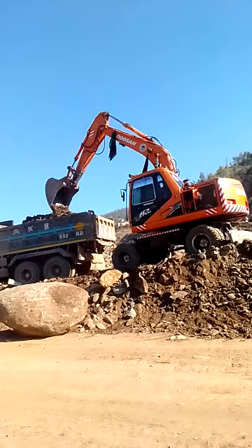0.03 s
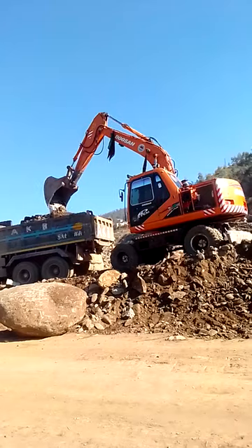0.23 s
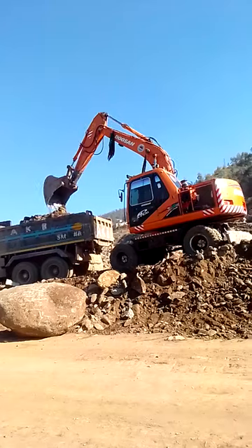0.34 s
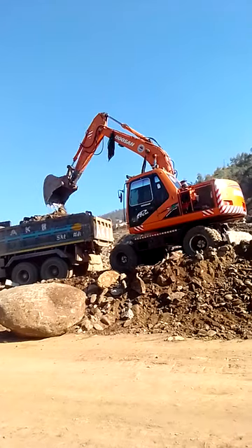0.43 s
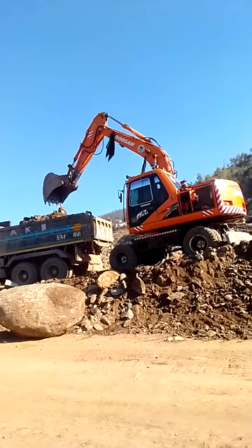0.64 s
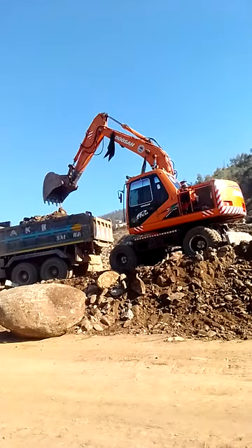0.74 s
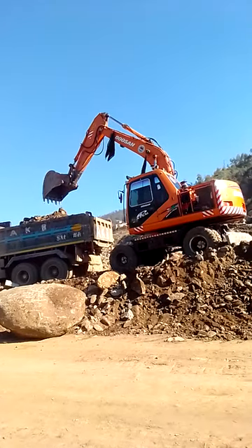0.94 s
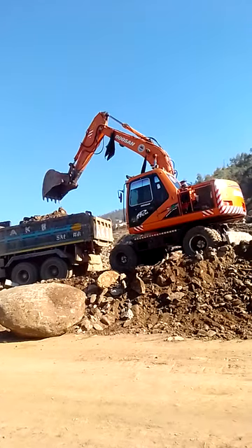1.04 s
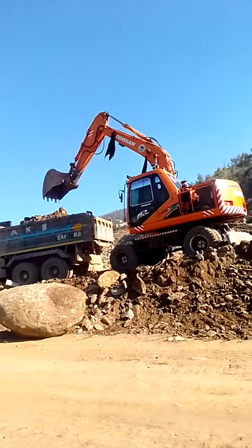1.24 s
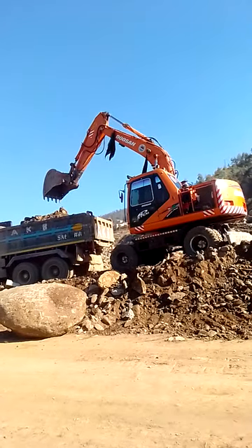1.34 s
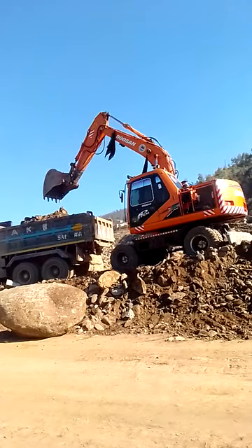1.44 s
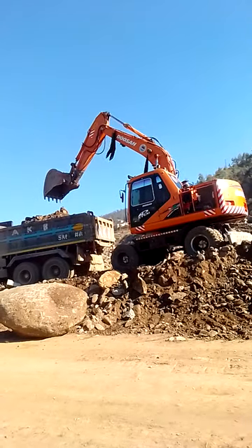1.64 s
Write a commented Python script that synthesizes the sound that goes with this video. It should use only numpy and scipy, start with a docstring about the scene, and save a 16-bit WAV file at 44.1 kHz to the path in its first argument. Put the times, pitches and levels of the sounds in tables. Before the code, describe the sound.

Rocks and soil crash into a metal dump truck bed, thinning out over a faint diesel drone

```python
"""Outdoors, some way off, an excavator tips earth and rubble into the steel bed of a dump truck.
Stones are filtered bursts of tiny impacts, with ringing side walls, clinking rocks and sprays of grit.
Lumps ring the bed floor in decaying sines over a thinning slide of soil, made of random grains.
A horn gives one short toot of summed harmonics; a diesel engine drones underneath as tones and noise."""
import sys
import numpy as np
from scipy import signal
from scipy.fft import rfft, irfft
from scipy.io import wavfile

SR = 44100
rng = np.random.default_rng(int(sys.argv[2]) if len(sys.argv) > 2 else 0)


def put_to_file(sound):
    """Save the sound as 16-bit audio at rate SR, in the file named by the first command-line argument."""
    columns = np.atleast_2d(sound).T  # one column per channel
    safe = np.clip(columns, -1, 1)
    whole_steps = np.round(safe * 32767)
    wavfile.write(sys.argv[1], SR, whole_steps.astype(np.int16))


N = 74970
T = np.arange(N) / SR
START_S = 0.2145


def amp(db):
    """Decibels to gain."""
    return 10 ** (np.asarray(db) / 20)


def evened(x):
    """Scales to rms 1."""
    return x / np.sqrt(np.mean(x ** 2) + 1e-20)


def decay(t, t60_s):
    """Exponential fall of 60 dB in t60_s."""
    return np.exp(-np.log(1000) * t / t60_s)


def onset(t, rise_s):
    """Exponential approach to 1 with time constant rise_s."""
    return 1 - np.exp(-t / rise_s)


def add(mix, start_s, sound):
    """Adds a sound into the mix at a time, cut at the end of the mix."""
    part = mix[max(round(start_s * SR), 0):][:len(sound)]
    part += sound[:len(part)]


def curve(rows, column=1):
    """Gain over time from one dB column of a table, interpolated in dB."""
    rows = np.array(rows)
    return amp(np.interp(T, rows[:, 0], rows[:, column]))


def taps(points, size=4096):
    """Minimum-phase filter with the spectrum given as (Hz, dB) points."""
    hz, db = np.transpose(points)
    grid_hz = abs(np.fft.fftfreq(size, 1 / SR)) + 1
    log_gain = np.log(amp(np.interp(np.log(grid_hz), np.log(hz), db)))
    # the Hilbert transform of the log gain gives the phase that makes the filter causal
    spectrum = np.exp(np.conj(signal.hilbert(log_gain)))
    return np.fft.ifft(spectrum).real[:size // 2]


def colour(x, response):
    """Passes a sound through a filter."""
    return signal.fftconvolve(x, response)[:len(x)]


def band(x, low_hz, high_hz):
    """Band-pass."""
    edges_hz = [low_hz, min(high_hz, SR / 2 - 1)]
    return signal.sosfilt(signal.butter(3, edges_hz, "band", fs=SR, output="sos"), x)


def drift(rate_hz):
    """Slow random wander of rms 1: noise under a Gaussian low-pass of width rate_hz."""
    lowpass = np.exp(-(np.fft.rfftfreq(N, 1 / SR) / rate_hz) ** 2)
    return evened(irfft(rfft(rng.standard_normal(N)) * lowpass, N))


def grains(per_s, spread_db, size=N):
    """Random tiny impacts of either sign, a few of them large, at rms 1."""
    hit = rng.random(size) < per_s / SR
    strength = np.minimum(rng.exponential(1, size), np.pi)
    sign = rng.choice([-1., 1.], size)
    return evened(hit * amp(spread_db * strength) * sign)


# Stones striking the load and the bed.
# Each row: start in seconds, then relative levels in dB of thud, clang, knock and crack.
STONE_HITS = [(.216, -61, -34, -40.5, -28.5), (.221, -43, -30.5, -35, -32), (.235, -44, -28.5, -35.5, -50),
              (.273, -53, -35, -33.5, -44), (.293, -32.5, -29, -31.5, -24.5), (.316, -46, -43, -50, -32.5),
              (.335, -36, -39, -37.5, -38), (.349, -39, -30, -30.5, -23.5),
              (.389, -34, -25.5, -31.5, -34.5), (.399, -31.5, -26.5, -44, -43),
              (.421, -43, -59, -37.5, -35), (.451, -48, -54, -38.5, -37.5), (.530, -37.5, -35, -59, -60),
              (.574, -43.5, -29.5, -38.5, -38.5), (.586, -49, -38, -54, -41), (.617, -55, -41, -63, -44),
              (.636, -46, -33, -66, -57), (.681, -34, -33.5, -44, -45), (.711, -41, -24.5, -29.5, -27),
              (.724, -34.5, -22, -31, -30), (.742, -37, -26.5, -37.5, -34.5), (.785, -50, -43, -41, -30),
              (.857, -38, -33.5, -44, -55), (.898, -42.5, -30, -41, -63), (.982, -47, -35, -75, -50.5),
              (.993, -40, -44, -67, -73), (1.050, -55, -42, -54, -40.5), (1.123, -43.5, -45, -65, -60),
              (1.211, -47, -41, -43.5, -41.5), (1.226, -41.5, -37.5, -49, -44),
              (1.241, -38, -30, -47.5, -43), (1.285, -39, -43, -65, -63), (1.613, -44, -41, -46, -50),
              (1.622, -40, -43, -44, -47.5), (1.638, -42, -38.5, -57, -50)]
# The four registers of a blow, thud to crack. Each row: low edge in Hz, high edge in Hz,
# burst t60 in seconds, tail level in dB re burst, tail t60 in seconds.
STONE_REGISTERS = [(168, 523, 0.086, -12.5, 0.68), (523, 1100, 0.058, -13, 0.52),
                   (1220, 3220, 0.11, -16.5, 0.67), (3250, 6250, 0.059, -16, 0.32)]
# Colour of the clatter; stones() shifts it up for early cracks. Each row: frequency in Hz, gain in dB.
CLATTER_COLOUR = [(100, -12.5), (190, -16), (275, 2.5), (370, -6), (450, -5), (540, -14), (670, 1),
                  (870, 4.5), (1070, -11.5), (1330, -4), (1550, -13), (1850, -12), (2300, -20),
                  (2600, -20.5), (3150, -31.5), (3550, -14.5), (4250, -7.5), (4750, -4), (5100, -17),
                  (5500, -17.5), (6250, -41), (9000, -52), (15500, -56)]
STONES_GAIN_DB = 2
STRIKE_RISE_S, TAIL_RISE_S = 0.0011, 0.011
CRUMBLE_PER_S, CRUMBLE_SPREAD_DB = 9000, 2.5
FIRST_LIFT_RATIO, SETTLE_S = 0.071, 0.2


def stones(size=26000):
    """Each stone crunches in a short burst of impacts, and the bed rattles on in a slower tail."""
    out, t = np.zeros(N), np.arange(size) / SR
    plain = taps(CLATTER_COLOUR)
    for start_s, *levels_db in STONE_HITS:
        # the first stones crack at a higher pitch, which sinks as the heap grows
        lift = 1 + FIRST_LIFT_RATIO * np.exp(-(start_s - START_S) / SETTLE_S)
        lifted = taps([(hz * lift, db) for hz, db in CLATTER_COLOUR])
        responses = [plain] * (len(STONE_REGISTERS) - 1) + [lifted]
        for level_db, response, register in zip(levels_db, responses, STONE_REGISTERS):
            low_hz, high_hz, burst_t60_s, tail_db, tail_t60_s = register
            voice = band(response, low_hz, high_hz)
            burst_part = (burst_t60_s, 0, STRIKE_RISE_S)
            tail_part = (tail_t60_s, tail_db, TAIL_RISE_S)
            for t60_s, part_db, rise_s in (burst_part, tail_part):
                shape = onset(t, rise_s) * decay(t, t60_s)
                crunch = grains(CRUMBLE_PER_S, CRUMBLE_SPREAD_DB, size) * shape
                sound = evened(colour(crunch, voice)) * np.sqrt(np.mean(shape ** 2))
                add(out, start_s, sound * amp(level_db + part_db + STONES_GAIN_DB))
    return out


# Modes of the steel side walls.
# Each row: frequency in Hz, bandwidth in Hz, level in dB.
SIDE_WALL_MODES = [(438, 7.1, -3), (1250, 23, -0.5), (1357, 10, 0), (4100, 15, 3.5), (4350, 30, 5.5),
                   (4640, 18, 2.5), (4890, 15, 6)]


def walls(blows):
    """The blows plus the side walls' resonances, which they set ringing."""
    ring = np.zeros(N)
    for hz, width_hz, db in SIDE_WALL_MODES:
        unit_peak = 2 * np.pi * width_hz / SR
        ring += amp(db) * unit_peak * np.exp(-np.pi * width_hz * T) * np.sin(2 * np.pi * hz * T)
    return blows + colour(blows, ring)


# Hard rocks that ring briefly.
# Each row: start in seconds, relative level in dB, centre pitch in Hz, t60 in seconds.
ROCK_CLINKS = [(.2205, -16, 805, 0.032), (0.3162, -20.5, 4274, 0.042), (0.334, -30.5, 5300, 0.03),
               (.422, -31.5, 4750, 0.042), (.451, -29.5, 4630, 0.025), (.461, -30, 4130, 0.034),
               (.617, -36, 4650, 0.036), (.741, -15.5, 813, 0.041), (.789, -24, 4250, 0.055),
               (.898, -22.5, 1235, 0.077), (1.052, -35, 4400, 0.037), (1.24, -38, 4400, 0.044),
               (1.623, -35, 807, 0.081)]
# Partials of a clink. Each row: ratio to the centre pitch, relative level in dB.
CLINK_PARTIALS = [(0.921, -9), (0.999, -1.5), (1.069, -4)]
ROCKS_GAIN_DB, ROCK_RISE_CYCLES = 2.0, 2.15


def rocks():
    """A hard rock clinks with a cluster of close, quickly dying partials."""
    out = np.zeros(N)
    for start_s, db, hz, t60_s in ROCK_CLINKS:
        ring = sum(amp(partial_db) * np.sin(2 * np.pi * (hz * ratio * T + rng.random()))
                   for ratio, partial_db in CLINK_PARTIALS)
        shape = onset(T, ROCK_RISE_CYCLES / hz) * decay(T, t60_s)
        add(out, start_s, amp(db + ROCKS_GAIN_DB) * ring * shape)
    return out


# Chips of grit that snap and scatter.
# Each row: start in seconds, relative level in dB, t60 in seconds.
GRIT_CHIPS = [(0.292, -60, 0.046), (0.336, -55, 0.033), (0.419, -59, 0.088), (0.611, -56.5, 0.1),
              (0.712, -60, 0.17), (1.066, -64, .12), (1.211, -62, .08)]
# Colour of the grit. Each row: frequency in Hz, gain in dB.
GRIT_COLOUR = [(800, -12), (2200, 3), (3200, -11), (5500, 18.5), (7000, 4.5), (9500, -5.5), (15500, -17)]
CHIPS_GAIN_DB, CHIP_GRAINS_PER_S, CHIP_SPREAD_DB = 8.5, 5500, 4.4


def chips():
    """Short bright sprays of grit: filtered impacts under a decay."""
    out, response = np.zeros(N), taps(GRIT_COLOUR)
    for start_s, db, t60_s in GRIT_CHIPS:
        spray = evened(colour(grains(CHIP_GRAINS_PER_S, CHIP_SPREAD_DB), response))
        add(out, start_s, amp(db + CHIPS_GAIN_DB) * spray * decay(T, t60_s))
    return out


# Heavy lumps that set the bed floor ringing.
# Each row: start in seconds, relative level in dB, ratio applied to the floor's pitches.
HEAVY_LUMPS = [(0.394, -44, 1.1), (1.215, -30, 1.004), (1.232, -40, 1.24), (1.368, -45.5, .97)]
# Modes of the bed floor. Each row: frequency in Hz at ratio 1, relative level in dB, t60 in seconds.
BED_FLOOR_MODES = [(145.5, -18, 1), (257.5, 3.5, 0.29), (268.4, 3.5, 0.46), (332, -3, 0.22),
                   (444.6, -11.5, .38), (690, -13.5, .45), (950, -17.5, 0.67)]


def lumps():
    """Heavy lumps boom on the bed floor, each exciting all its modes as decaying sines."""
    out = np.zeros(N)
    for start_s, db, ratio in HEAVY_LUMPS:
        ring = sum(amp(mode_db - 60 * T / t60_s) * np.sin(2 * np.pi * hz * ratio * T)
                   for hz, mode_db, t60_s in BED_FLOOR_MODES)
        add(out, start_s, amp(db) * ring * onset(T, 0.013))
    return out


# The truck's frame jolted by the load.
# Each row: start in seconds, relative level in dB, frequency in Hz.
FRAME_JOLTS = [(.395, -40, 120.4), (.402, -41.5, 89.5), (0.881, -47, 93.2), (1.631, -48.5, 129)]


def jolts():
    """The load jolts the frame, a low sine with a soft onset and a short decay."""
    out = np.zeros(N)
    for start_s, db, hz in FRAME_JOLTS:
        shape = onset(T, 0.0057) * np.exp(-T / 0.033)
        add(out, start_s, amp(db) * np.sin(2 * np.pi * hz * T) * shape)
    return out


# Sliding soil and gravel.
# Each row: time in seconds, then levels in dB of the body, the treble and the sandy fizz.
SLIDE_LEVELS = [(.215, -36, -33, -81), (.3, -36, -35.5, -73), (.42, -33.5, -36, -67),
                (.49, -40, -45.5, -70.5), (.6, -37, -44.5, -65), (.66, -40, -52.5, -71),
                (.75, -41, -41.5, -68.5), (.9, -40.5, -46.5, -71.5), (1.0, -42, -60, -70.5),
                (1.09, -55, -52.5, -71.5), (1.19, -52.5, -59.5, -73), (1.33, -49, -62, -74.5),
                (1.55, -57, -65, -77), (1.7, -50, -74, -76.5)]
SOIL_PER_S, SOIL_SPREAD_DB = 2200, 1.5
GRAVEL_PER_S, GRAVEL_SPREAD_DB = 1300, 1.3
SAND_PER_S, SAND_SPREAD_DB = 8700, 2.4
SAND_FLUTTER_DB, SAND_FLUTTER_HZ = 0.95, 50


def slide():
    """Soil and gravel pour on to the heap as filtered grains, with a faint fluttering fizz of sand."""
    response = taps(CLATTER_COLOUR)
    sand_response = taps([(2000, -26), (6000, 1.5), (8000, 3), (10000, -2.5), (15500, -4.5)])
    body = evened(band(colour(grains(SOIL_PER_S, SOIL_SPREAD_DB), response), 183, 1470))
    gravel = evened(band(colour(grains(GRAVEL_PER_S, GRAVEL_SPREAD_DB), response), 1630, 13500))
    sand = evened(colour(grains(SAND_PER_S, SAND_SPREAD_DB), sand_response))
    flutter = amp(SAND_FLUTTER_DB * drift(SAND_FLUTTER_HZ))
    return (body * curve(SLIDE_LEVELS, 1) + gravel * curve(SLIDE_LEVELS, 2)
            + sand * curve(SLIDE_LEVELS, 3) * flutter)


# Harmonics of the horn.
# Each row: multiple of the pitch, relative level in dB at mid-toot, change over the toot in dB.
HORN_HARMONICS = [(1, -26, -2), (2, 5, -4.5), (3, 2, -2), (4, -9, -14), (5, -9.5, -6), (6, -8.5, 6),
                  (7, -18.5, -17), (9, -14.5, -9), (10, -2.5, 0), (11, -9.5, -5), (12, -9, 4.5)]
HORN_ON_S, HORN_OFF_S, HORN_RISE_S, HORN_T60_S = 0.706, 0.883, 0.0029, 0.28
HORN_HZ, HORN_GAIN_DB = 403, -39
HORN_RASP_RATIO, HORN_RASP_HZ = 0.0027, 200
HORN_FLUTTER_DB, HORN_FLUTTER_HZ = 2.46, 70


def horn():
    """A rasping diaphragm at a nearly steady pitch, its colour shifting; the echo dies across the site."""
    turns = np.cumsum(HORN_HZ * (1 + HORN_RASP_RATIO * drift(HORN_RASP_HZ))) / SR
    progress = np.clip((T - HORN_ON_S) / (HORN_OFF_S - HORN_ON_S), 0, 1) - 0.5
    buzz = np.zeros(N)
    for multiple, db, change_db in HORN_HARMONICS:
        level_db = db + change_db * progress + HORN_FLUTTER_DB * drift(HORN_FLUTTER_HZ)
        buzz += amp(level_db) * np.cos(2 * np.pi * (multiple * turns + rng.random()))
    attack = np.clip((T - HORN_ON_S) / HORN_RISE_S, 0, 1)
    echo = decay(np.maximum(T - HORN_OFF_S, 0), HORN_T60_S)
    return amp(HORN_GAIN_DB) * buzz * attack * echo


# Low tones of the engine. Each row: multiple of the firing rate, relative level in dB.
ENGINE_TONES = [(1, -15.5), (1.08, -7.5), (2, -1.5), (3, -3.5)]
# Engine level. Each row: time in seconds, gain in dB on tones and rumble.
ENGINE_LEVELS = [(.2, -61.5), (.45, -49.5), (1.0, -55.5), (1.36, -50.5), (1.56, -63.5), (1.7, -63.5)]
# Colour of the engine rumble. Each row: frequency in Hz, gain in dB.
RUMBLE_COLOUR = [(20, -36), (55, -29), (78, -17.5), (120, -3.5), (170, -17.5), (230, 3), (400, -28),
                 (1500, -93)]
FIRING_HZ, FIRING_WANDER_RATIO, FIRING_WANDER_HZ = 73.3, 0.0047, 15
TONE_WANDER_DB, TONE_WANDER_HZ = 2.2, 7.9
RUMBLE_RE_TONES_DB = -0.5


def engine():
    """Diesel: low tones at multiples of a wandering firing rate, over filtered noise rumble."""
    turns = np.cumsum(FIRING_HZ * (1 + FIRING_WANDER_RATIO * drift(FIRING_WANDER_HZ))) / SR
    drone = np.zeros(N)
    for multiple, db in ENGINE_TONES:
        level_db = db + TONE_WANDER_DB * drift(TONE_WANDER_HZ)
        drone += amp(level_db) * np.cos(2 * np.pi * (multiple * turns + rng.random()))
    rumble = evened(colour(rng.standard_normal(N), taps(RUMBLE_COLOUR)))
    return (drone + amp(RUMBLE_RE_TONES_DB) * rumble) * curve(ENGINE_LEVELS)


# Colour of the fan and hydraulic noise. Each row: frequency in Hz, gain in dB.
WASH_COLOUR = [(30, -28), (130, -6.5), (260, 4), (500, -8.5), (720, 5), (1050, -7.5), (1350, -3.5),
               (2000, -10), (3150, -12.5), (4300, 0.5), (4900, -8.5), (6300, -16.5), (9500, -55),
               (15500, -29.5)]
WASH_DB, WASH_WANDER_DB, WASH_WANDER_HZ = -52, 0.54, 30


def wash():
    """Fan and hydraulic noise: filtered noise at a slightly wandering level."""
    noise = evened(colour(rng.standard_normal(N), taps(WASH_COLOUR)))
    return amp(WASH_DB + WASH_WANDER_DB * drift(WASH_WANDER_HZ)) * noise


def scene():
    """Sums all sources into one channel."""
    load = walls(stones()) + rocks() + chips() + lumps() + jolts() + slide()
    return (load + horn() + engine() + wash())[None]


FADE_IN_S, EDGE_HZ = 0.0042, 15750


def record(dry):
    """Cuts in with a short fade after silence, then low-passes."""
    opened = dry * np.clip((T - START_S) / FADE_IN_S, 0, 1)
    lowpass = signal.firwin(511, EDGE_HZ, window=("kaiser", 9), fs=SR)
    return signal.oaconvolve(opened, lowpass[None], "same")


dry = scene()
out = record(dry)
put_to_file(out)
```